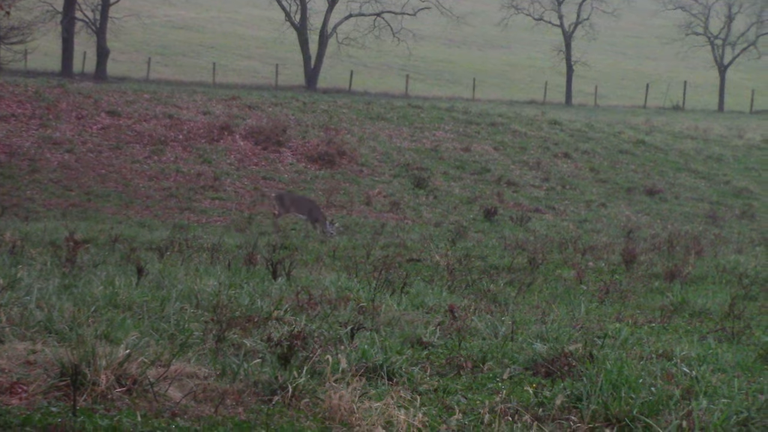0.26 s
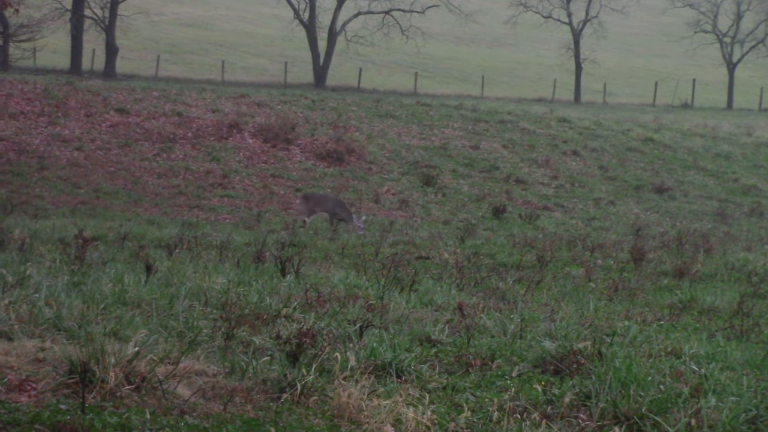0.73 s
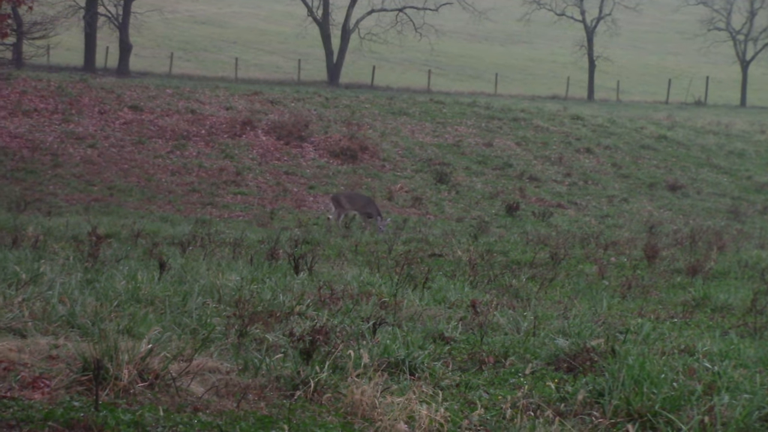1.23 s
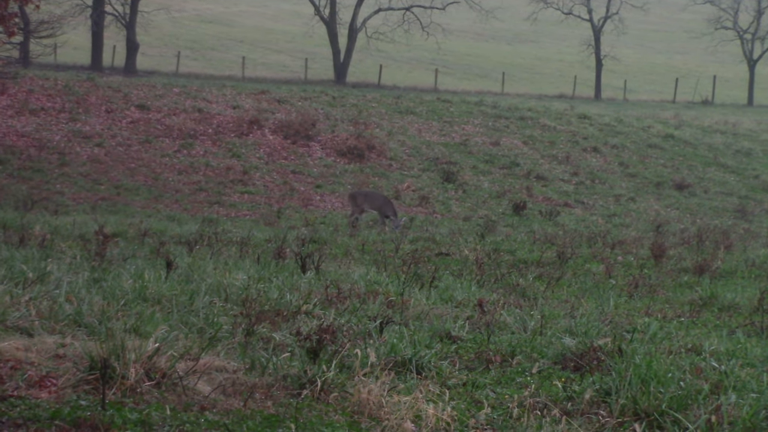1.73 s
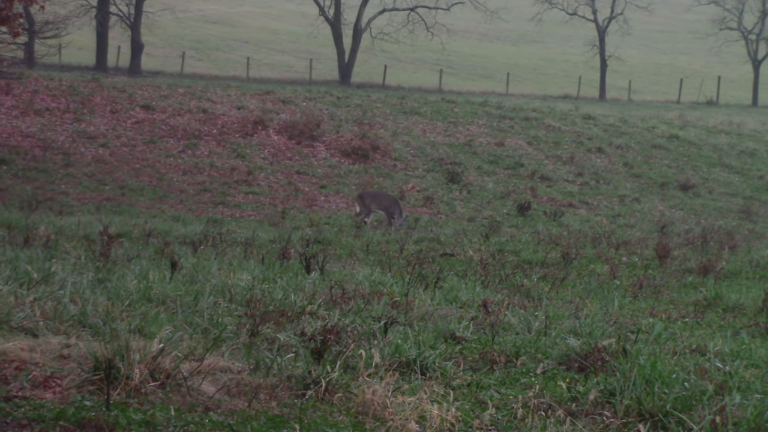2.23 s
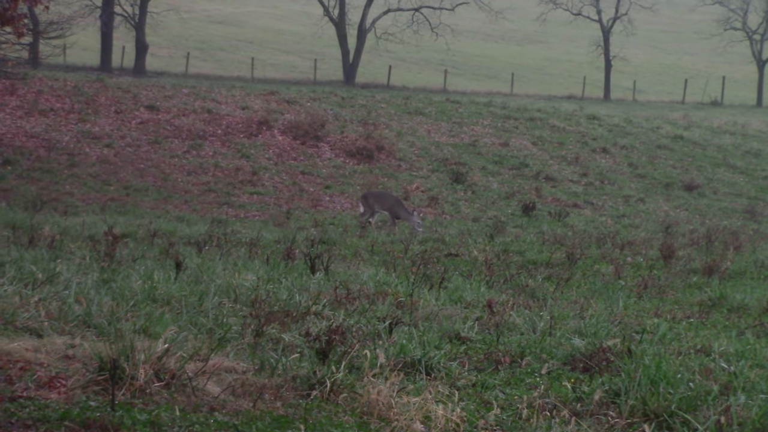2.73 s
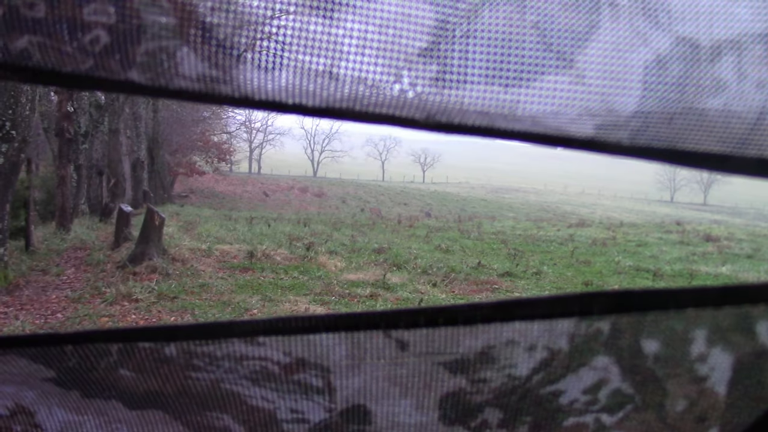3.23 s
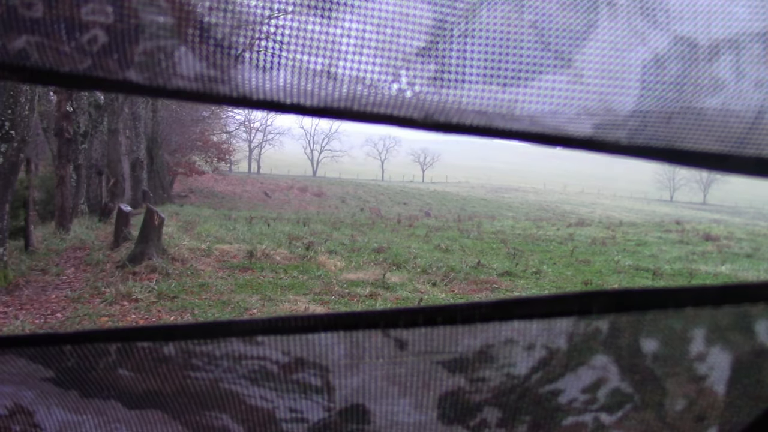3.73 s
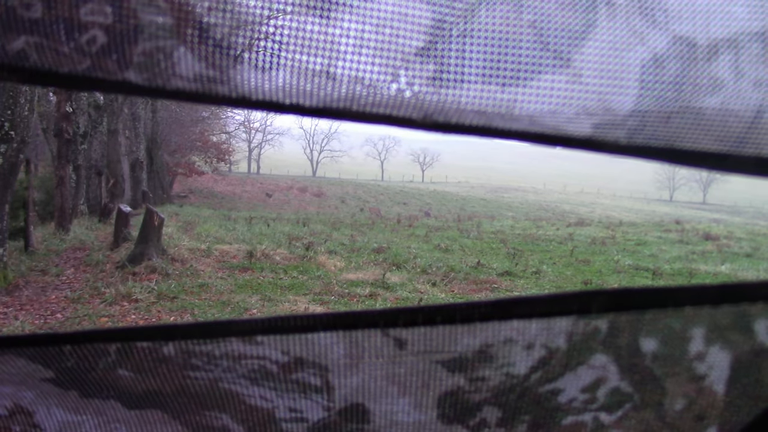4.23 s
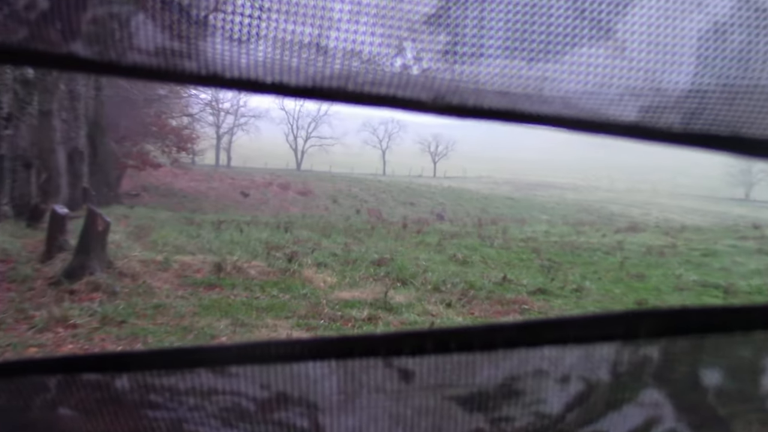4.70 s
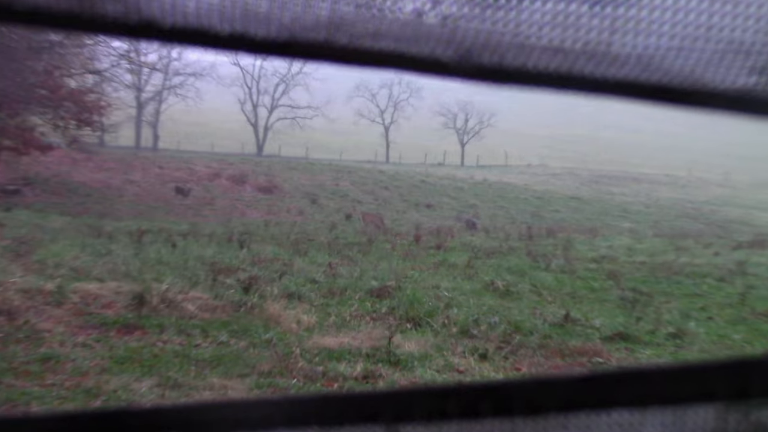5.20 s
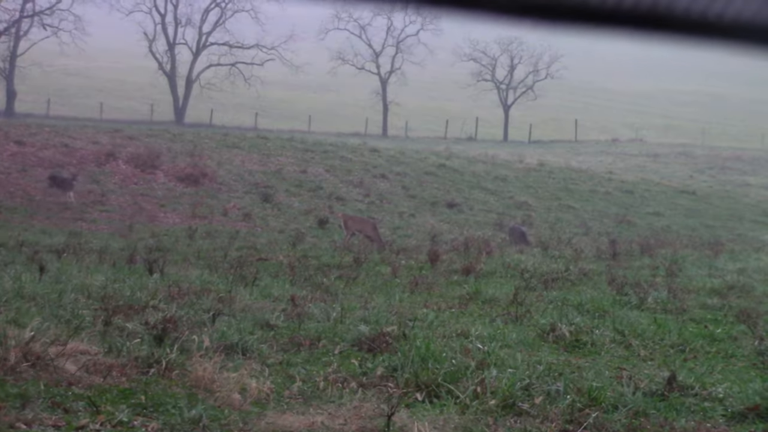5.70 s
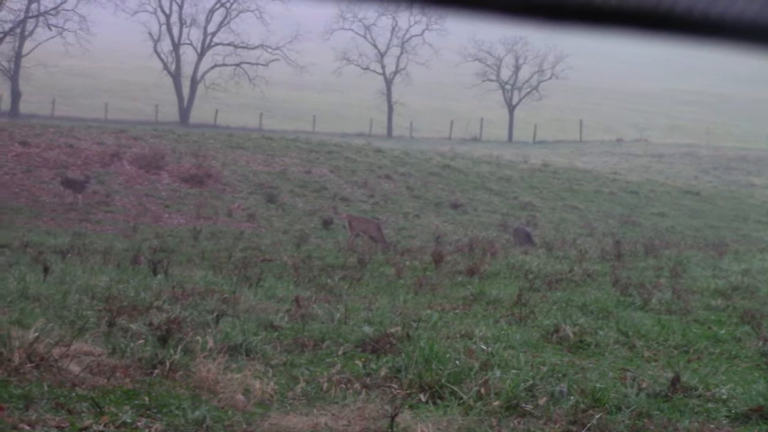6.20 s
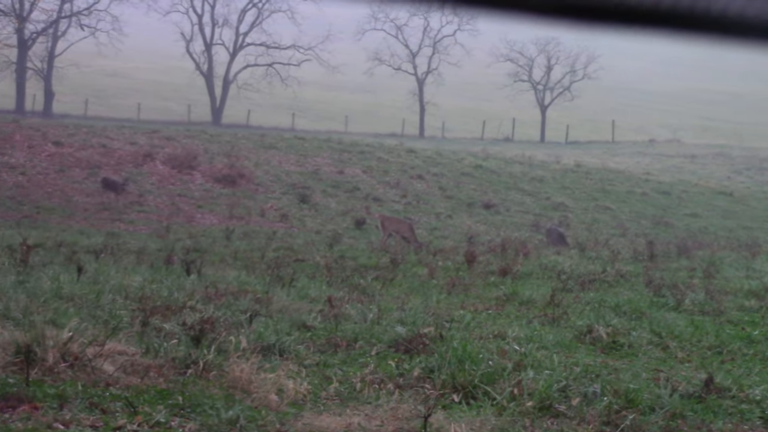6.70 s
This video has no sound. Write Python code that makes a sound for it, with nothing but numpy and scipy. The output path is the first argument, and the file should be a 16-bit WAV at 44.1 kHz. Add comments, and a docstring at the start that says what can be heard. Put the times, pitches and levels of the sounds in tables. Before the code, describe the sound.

Rain heard inside a cloth hide: faint drizzle and distant bird peeps, then suddenly louder hiss and patter with heavy drips hitting the roof.

```python
"""Rain on a fabric hide

Heard from inside, at the edge of a pasture: a light drizzle, then an abrupt change of scene to a steady
shower that patters on the cloth over the hiss of the field. Fat drops from the trees thump the taut
roof and excite its modes, small ones tick on leaves, and a far bird peeps."""
import sys
import numpy as np
from scipy import signal
from scipy.fft import rfft, irfft
from scipy.io import wavfile
from scipy.ndimage import uniform_filter1d

SR = 44100
rng = np.random.default_rng(int(sys.argv[2]) if len(sys.argv) > 2 else 0)


def log_audio(samples):
    """Write samples as a 16-bit WAV file to the path given in sys.argv[1]."""
    # one column per channel
    frames = np.atleast_2d(samples).T
    # limit to full scale, then quantise
    limited = np.clip(frames, -1, 1)
    pcm = np.round(limited * 32767).astype(np.int16)
    wavfile.write(sys.argv[1], SR, pcm)


N = 306495
DRIZZLE_END_S, SHOWER_START_S = 2.970, 2.979


def fat_drops(mix, ring_ratio=0.27):
    """Resonance: a tree drip's pitch selects the roof's modes, and the stronger the roof rings, the louder its
    echo."""
    # Each row: start in seconds, level in dB, pitch in Hz, relative ring in dB, relative spray in dB.
    drips = [(0.1003, -40.5, 3600, -18, -14), (0.1852, -43, 3400, -18, -13), (.849, -42, 5000, -22, -14),
             (1.884, -2, 1420, -27, -31.5), (1.9931, -25, 2200, -19, -20), (3.2227, -18.5, 3170, -23, -23),
             (3.243, -16.5, 1320, -1.5, -16), (3.429, -20, 2310, -18, -21), (3.958, -19.5, 1760, -29, -28),
             (4.0411, -13, 2240, -9.5, -22.5), (4.2161, -20, 2360, -14, -21),
             (4.4198, -20.5, 2300, -23, -26), (4.448, -20, 2340, -23, -27), (4.9519, -16.5, 2050, -42, -41),
             (5.6765, -7, 1920, -2.5, -18), (5.8016, -10.5, 1590, 3, -21), (5.9184, -10, 1720, -6.5, -15.5)]
    for start, db, hz, ring_db, spray_db in drips:
        echo_db = -0.5 + 0.35 * ring_db
        add(mix, start, amp(db) * drop(hz, ring_db, ring_ratio * hz, echo_db, spray_db))


def drop(hz, ring_db, ring_hz, echo_db, spray_db, slap_s=0.0067, slap_db=-7, slap_ratio=1.9):
    """Impact on a membrane: the cloth swings, slaps back more lightly, rings, echoes and sheds spray."""
    t = seconds(size=5000)
    hit = swing(t, hz)
    echo = signal.fftconvolve(hit, hide_echo(t))[:len(t)]
    echo = high_passed(echo, hz=456)  # bass passes out through the walls
    echo += amp(slap_db) * swing(t - slap_s, slap_ratio * hz)
    cloth = hit + amp(ring_db) * roof_ring(t, ring_hz) + amp(echo_db) * echo
    cloth = high_passed(cloth, hz=116)  # thin cloth radiates no deep bass
    return softened(cloth, hz=9100) + amp(spray_db) * spray(t)


def swing(t, hz, sag=1.07):
    """Tension as restoring force: dented cloth springs back, slower as the dent spreads."""
    cycles = np.log1p(sag * hz * np.maximum(t, 0)) / sag
    envelope = np.exp(-((cycles - .65) / .85) ** 2)
    return -np.sin(2 * np.pi * cycles) * envelope


def roof_ring(t, centre_hz, octaves=0.63, delay_s=0.0012, rise_s=0.0043):
    """Normal modes: the point of impact decides which speak; they start as the wave reaches the seams."""
    # Each row: frequency of a roof mode in Hz, level in dB, time to decay by 60 dB in seconds.
    modes = [(173, -32, 0.13), (200, -5, 0.11), (352, -1.5, 0.055), (415, 1, 0.04), (505, 2.5, 0.027),
             (590, -2, 0.02), (724, -27, 0.029), (997, 8.5, 0.032), (1267, -16, 0.08), (1534, 2.5, 0.063),
             (1910, -20, 0.037), (2730, -13, .045)]
    age = np.maximum(t - delay_s, 0)
    ring = np.zeros(len(t))
    for hz, db, t60 in modes:
        excitation = np.exp(-.5 * (np.log2(hz / centre_hz) / octaves) ** 2)
        ring += excitation * amp(db - 60 * age / t60) * np.sin(2 * np.pi * hz * age)
    onset = 1 - np.exp(-(age / rise_s) ** 2)
    return -ring * onset


def spray(t, burst_s=.0072, burst_db=1, burst_t60=0.045, splash_t60=0.12, mist_db=-13, mist_t60=0.25):
    """Incoherent sources add in power: the splash, its crown bursting a moment later, settling mist."""
    # Water bursting off the cloth. Each row: frequency in Hz, relative spectral density in dB.
    spectrum = [(300, -34), (1200, 7), (3200, 2), (5500, -7), (8000, -10.5), (11000, -23), (15500, -47)]
    splash = amp(-60 * t / splash_t60)
    burst = amp(burst_db - 60 * np.abs(t - burst_s) / burst_t60) * (t > burst_s)
    mist = amp(mist_db - 60 * t / mist_t60)
    fizz = unit(coloured(rng.standard_normal(len(t)), spectrum))
    return fizz * np.sqrt(splash ** 2 + burst ** 2 + mist ** 2)


def hide_echo(t, delay_s=0.0041, t60=0.085):
    """Reverberation: weak reflections between the cloth walls build up until the far wall answers."""
    build_up = np.minimum(t / delay_s, 1) ** 2
    taps = rng.choice([-1., 1.], len(t)) * (rng.random(len(t)) < .25)
    taps = taps * build_up * amp(-60 * t / t60)
    return taps / np.linalg.norm(taps)


def shower():
    """Superposition of many impacts: a loud wash from the field, with dense patter on the cloth."""
    # The field in a shower. Each row: frequency in Hz, relative spectral density in dB.
    spectrum = [(20, -37.0), (45, -48), (70, -25), (95, -3.5), (150, -7.5), (240, -7), (340, 2),
                (900, -0.5), (1600, -3.5), (3000, -8.5), (5000, -13), (8300, -19.5), (12000, -34),
                (15300, -49.5)]
    field = amp(-38) * wash(spectrum, patchy_db=0.5, flicker_db=0.18)
    roof = patter(per_s=260, spread_db=5.5, low_hz=1806, high_hz=7160, echo_db=-5, spray_db=-21)
    leaves = crackle(per_s=260, spread_db=1.5, low_hz=2210, high_hz=8100, t60=0.0086)
    return field + amp(-40) * roof + amp(-49) * leaves


def drizzle():
    """Low impact energy: droplets all of much the same size give a soft wash and sparser, light taps."""
    # The field in drizzle. Each row: frequency in Hz, relative spectral density in dB.
    spectrum = [(20, -23), (45, -23), (70, -9.5), (100, 2.5), (170, -2.5), (250, -2.5), (370, 1.5),
                (550, -2), (900, -4), (2000, -15), (4500, -21.5), (8300, -27.0), (12000, -38.0),
                (15300, -44.5)]
    field = amp(-53) * wash(spectrum, patchy_db=1.34, flicker_db=0.3)
    roof = patter(per_s=150, spread_db=1.5, low_hz=2980, high_hz=7200, echo_db=0, spray_db=-21)
    leaves = crackle(per_s=100, spread_db=1, low_hz=2520, high_hz=9000, t60=0.0048)
    return field + amp(-62.5) * roof + amp(-70.5) * leaves


def patter(per_s, spread_db, low_hz, high_hz, echo_db, spray_db, ring_db=-18, count=28):
    """Size scaling: of the raindrops all over the roof, the smaller sound higher and weaker."""
    sounds = [np.sqrt(low_hz / hz) * drop(hz, ring_db, rng.uniform(300, 1340), echo_db, spray_db)
              for hz in np.geomspace(low_hz, high_hz, count)]
    return scatter(sounds, per_s, spread_db)


def splashes(mix, faint_db=-55, faint_t60=0.048, halving_db=10.5):
    """Distance cues: near splashes on leaves and mesh are loud and dry, far ones faint and smeared."""
    # Each row: start in seconds, initial level in dB, centre frequency in Hz, half width in octaves.
    impacts = [(.640, -55, 6600, .45), (.850, -54, 6000, 0.43), (1.037, -64, 8600, .3),
               (1.175, -63, 8000, .3), (2.072, -47, 2670, .2), (2.606, -48, 2190, .25),
               (2.607, -63, 10200, .12), (3.588, -25.5, 7100, .2), (3.587, -49, 12000, .4),
               (3.6475, -40, 9100, .45), (4.368, -28, 3800, 0.46), (5.06, -38, 7500, .4)]
    for start, db, hz, octaves in impacts:
        t60 = faint_t60 * 2 ** ((faint_db - db) / halving_db)
        add(mix, start, amp(db) * tick(hz, octaves, t60))


def tick(hz, octaves, t60):
    """Exponential decay: a tiny splash is a sudden band of noise that dies at once."""
    t = seconds(size=5000)
    edges = np.minimum(hz * 2. ** np.array([-octaves, octaves]), [SR / 3, SR / 2.2])
    band = signal.butter(2, edges, "bandpass", fs=SR, output="sos")
    fizz = rng.standard_normal(len(t)) * amp(-60 * t / t60)
    power_share = 2 * (edges[1] - edges[0]) / SR
    return signal.sosfilt(band, fizz) / np.sqrt(power_share)


def crackle(per_s, spread_db, low_hz, high_hz, t60, count=24):
    """Shot noise: fine droplets tick on the dead leaves and grass nearby, the higher ones weaker."""
    sounds = [low_hz / hz * tick(hz, octaves=0.51, t60=t60 * rng.uniform(0.21, 2.7))
              for hz in np.geomspace(low_hz, high_hz, count)]
    return softened(scatter(sounds, per_s, spread_db), hz=11000)


def wash(spectrum, patchy_db, flicker_db):
    """Random phases: countless far drops merge into a hiss with brief patches and a shared flicker."""
    hz = np.fft.rfftfreq(2048, 1 / SR)
    frames = N // 512 + 6
    real, imag, patches = rng.standard_normal((3, frames, len(hz)))
    patches = uniform_filter1d(patches, size=5, axis=0)  # smooth in time
    patches = unit(uniform_filter1d(patches, size=30, axis=1))  # and in frequency
    flicker = unit(uniform_filter1d(rng.standard_normal((frames, 1)), size=5, axis=0))
    level_db = spectrum_db(spectrum, hz) + patchy_db * patches + flicker_db * flicker
    field = (real + 1j * imag) * amp(level_db)
    return unit(signal.istft(field.T, nperseg=2048, noverlap=1536)[1][:N])


def bird(mix, note_s=0.056, blur_hz=120):
    """Spectral broadening: a far bird's thin, gliding whistles are blurred by the trees they cross."""
    # Each row: start in seconds, peak level in dB, starting pitch in Hz, glide in Hz per second.
    peeps = [(.228, -66, 4650, 1900), (1.229, -53.5, 3220, -8500), (1.615, -57, 3030, 0),
             (2.635, -64, 4840, 2000)]
    t = seconds(size=round(note_s * SR))
    envelope = np.sin(np.pi * t / note_s)
    for start, db, start_hz, glide in peeps:
        jitter = unit(uniform_filter1d(rng.standard_normal(SR), size=60))[:len(t)]
        hz = start_hz + glide * t + blur_hz * jitter
        add(mix, start, amp(db) * envelope * np.sin(2 * np.pi * np.cumsum(hz) / SR))


def scatter(sounds, per_s, spread_db):
    """Poisson process: impacts fall at independent moments; most are small, a few larger."""
    out = np.zeros(N)
    for sound in sounds:
        chance, size = rng.random((2, N))
        hits = np.flatnonzero(chance < per_s / len(sounds) / SR)
        levels_db = spread_db * np.minimum(-np.log(size[hits]), 2.8)
        for i, gain in zip(hits, amp(levels_db)):
            add(out, i / SR, gain * sound)
    return unit(out)


def softened(x, hz):
    """Finite contact time: water lands softly, so its impact lacks the highest treble."""
    return signal.sosfilt(signal.butter(4, hz, fs=SR, output="sos"), x)


def high_passed(x, hz):
    return signal.sosfilt(signal.butter(2, hz, "highpass", fs=SR, output="sos"), x)


def coloured(x, spectrum):
    """Linear filtering: weights each frequency of x by the spectrum."""
    hz = np.fft.rfftfreq(len(x), 1 / SR)
    return irfft(rfft(x) * amp(spectrum_db(spectrum, hz)), len(x))


def spectrum_db(points, hz):
    """Interpolation: joins (Hz, dB) points on a log-frequency axis."""
    point_hz, db = np.transpose(points)
    return np.interp(np.log(hz + 1), np.log(point_hz + 1), db)


def amp(db):
    return 10 ** (np.asarray(db) / 20)


def unit(x):
    return x / np.sqrt(np.mean(x ** 2) + 1e-20)


def seconds(size):
    return np.arange(size) / SR


def add(mix, start_s, sound):
    part = mix[round(start_s * SR):][:len(sound)]
    part += sound[:len(part)]


def scene():
    """Superposition: drizzle, then the shower, with single drops, splashes and the bird on top."""
    t = seconds(size=N)
    mix = drizzle() * (t < DRIZZLE_END_S) + shower() * (t > SHOWER_START_S)
    fat_drops(mix)
    splashes(mix)
    bird(mix)
    return mix[None]


def record(dry):
    """Band limiting: a steep low-pass filter removes the highest treble."""
    edge_hz = 15750
    low_pass = signal.firwin(511, edge_hz, window=("kaiser", 9), fs=SR)
    return signal.oaconvolve(dry, low_pass[None], "same")


dry = scene()
out = record(dry)
log_audio(out)
```